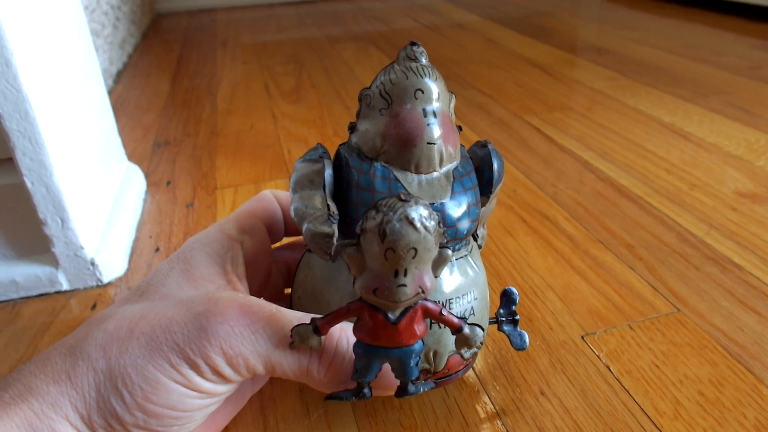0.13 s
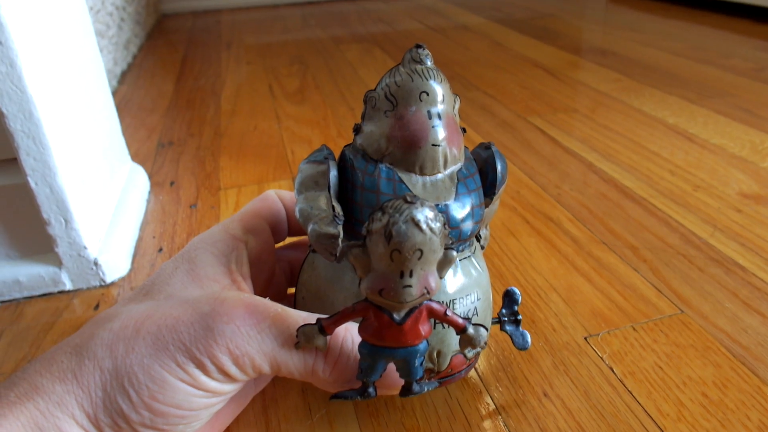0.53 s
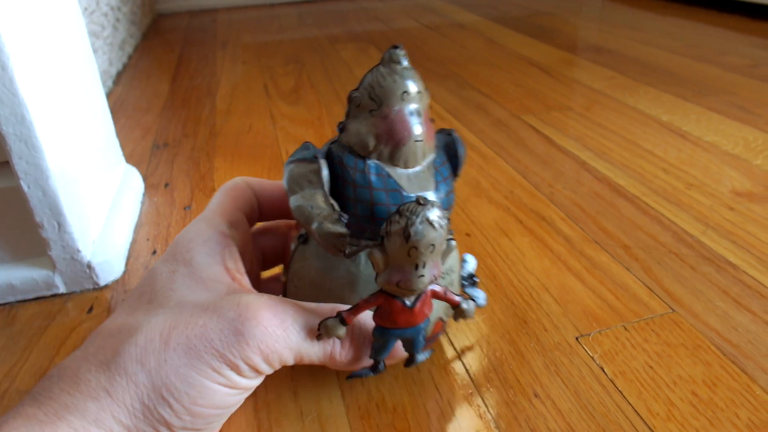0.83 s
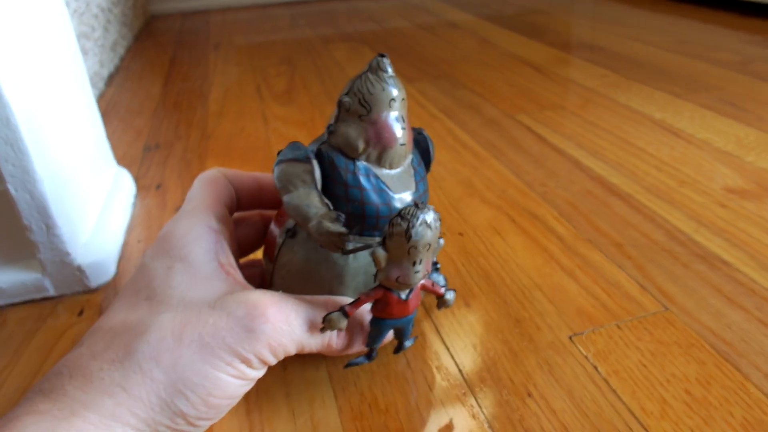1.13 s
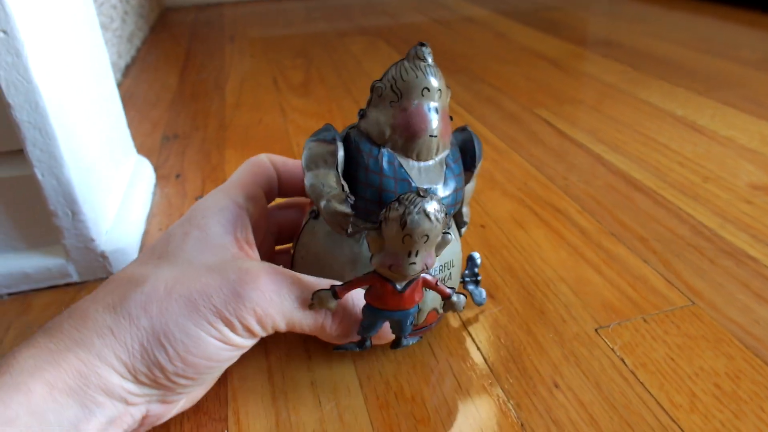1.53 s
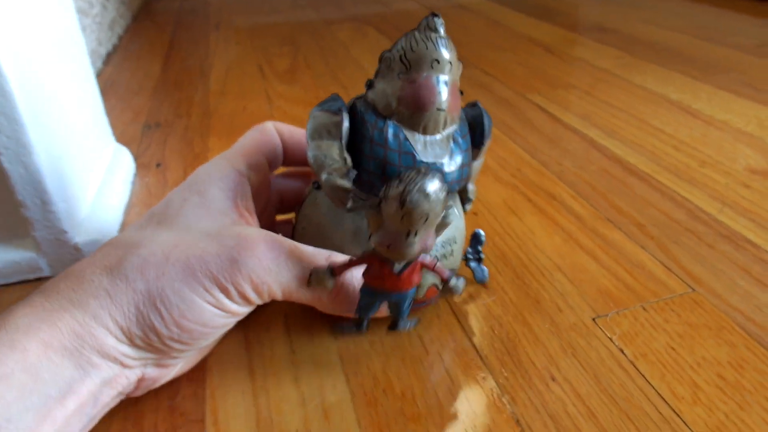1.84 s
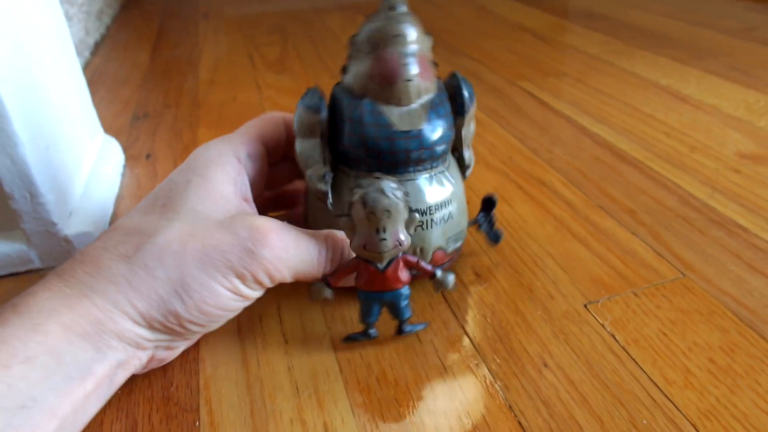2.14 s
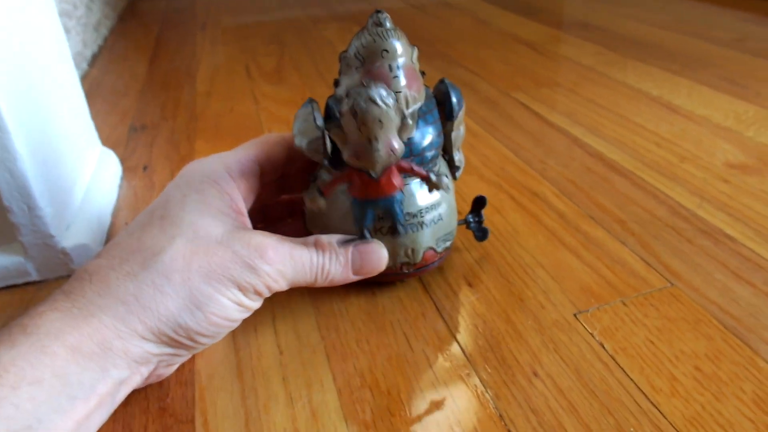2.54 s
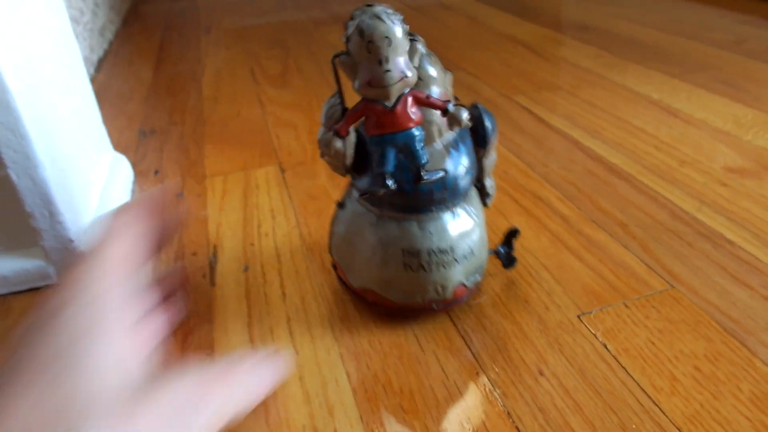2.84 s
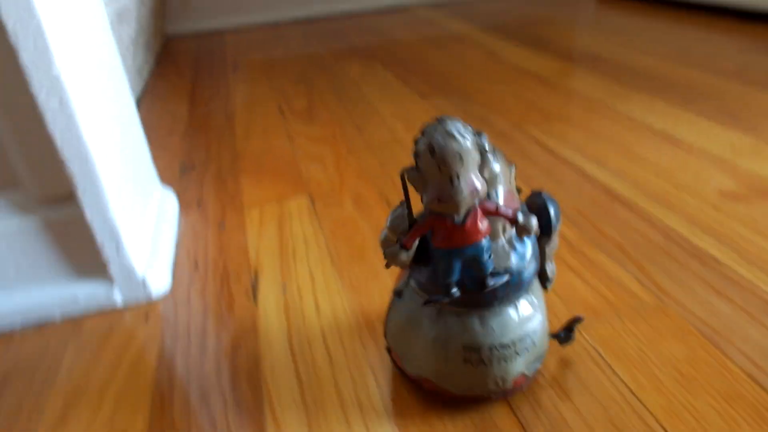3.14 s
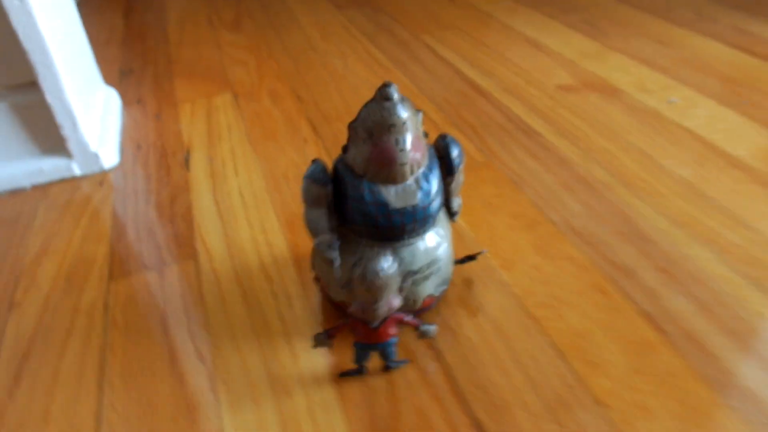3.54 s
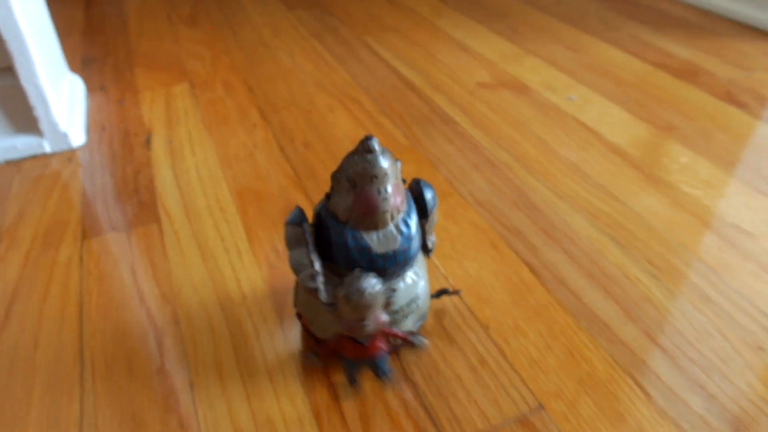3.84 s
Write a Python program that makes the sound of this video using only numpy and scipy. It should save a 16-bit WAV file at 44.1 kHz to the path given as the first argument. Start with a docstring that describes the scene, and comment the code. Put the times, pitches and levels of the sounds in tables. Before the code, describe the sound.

A wind-up tin toy on a wooden floor, heard close in a quiet room with faint hum and hiss. A soft tick at 0.4 s, small ticks and tin knocks at 1.1-1.4 s, then a faint judder and squeak until 1.75 s. From 1.86 s loud clockwork clacks and gears chatter, slowing and stumbling around 2.2-2.5 s, then running fast, about forty-five clacks a second, with tinny ringing, clinks and floor thuds, until the cut at 4 s.

```python
"""A wind-up tin toy on a wooden floor in a quiet room: small joints tick (damped noise bursts).
As the hand turns it, loose tin knocks (ringing bursts) and the base judders on the boards, slow to squeaky (slips).
Then the clockwork clacks (double-decay blows) over chattering gears (a click per tooth), stumbles under the hand
and runs free; the tin shell rings (resonances), a loose part clinks (damped sines), the base scrapes and bumps.
Room tone, a wavering hum, a faint whine and hiss lie beneath."""
import sys
import numpy as np
from scipy import signal
from scipy.fft import rfft, irfft
from scipy.io import wavfile
from scipy.ndimage import uniform_filter1d

SR = 44100
rng = np.random.default_rng(int(sys.argv[2]) if len(sys.argv) > 2 else 0)


def persist_wave(psi):
    """Save psi, clipped to +-1, as 16-bit WAV."""
    counts = np.round(np.clip(psi, -1, 1) * 32767).astype(np.int16)
    wavfile.write(sys.argv[1], SR, np.atleast_2d(counts).T)


N = 176400
T = np.arange(N) / SR
FREQ = np.maximum(np.arange(N + 1) * SR / (2 * N), 1)
BLOW_GRAIN, GEAR_GRAIN = 0.14, 0.27  # unevenness of the tiny contacts (log size)


def undb(db):
    """Decibels to gain."""
    return 10 ** (np.asarray(db) / 20)


def curve(table, axis=1):
    """One column of a table, linear in time."""
    rows = np.array(table)
    return np.interp(T, rows[:, 0], rows[:, axis])


def across(table):
    """A table, linear over log frequency."""
    rows = np.array(table)
    return np.interp(np.log(FREQ), np.log(rows[:, 0]), rows[:, 1])


def apply(x, response):
    """Filter by a frequency response."""
    return irfft(rfft(x, 2 * N) * response)[..., :N]


def colour(table):
    """Causal (minimum-phase) response of unit power through (f/Hz, gain/dB) points."""
    gain = undb(across(table))
    cepstrum = irfft(np.log(gain / np.sqrt(np.mean(gain ** 2))))
    cepstrum[1:N] *= 2
    cepstrum[N + 1:] = 0
    return np.exp(rfft(cepstrum))


def modes(table):
    """Summed response of damped resonances (f/Hz, width/Hz, gain/dB)."""
    return sum(undb(db) / (1 + 1j * (FREQ ** 2 - hz ** 2) / (FREQ * width)) for hz, width, db in table)


def walk(rate_hz):
    """Smooth random drift with a spread near 1."""
    k = max(int(SR / rate_hz), 2)
    steps = np.repeat(rng.standard_normal(N // k + 1), k)
    return uniform_filter1d(steps, k)[:N] * np.sqrt(3 / 2)


def grains(uneven):
    """Dense tiny contacts at two microphones: alike in the bass, unlike in the treble."""
    # unlike part of the power: f/Hz, share [0..1]
    unlike = [(300, 0.0054), (2500, 0.17), (5000, 0.45), (10000, 0.97)]
    size = np.exp(uneven * np.repeat(rng.standard_normal(N // 12 + 1), 12)[:N])
    noise = rng.standard_normal((3, N)) * size / np.sqrt(np.mean(size ** 2))
    share = np.clip(across(unlike), 0, 1)
    return apply(noise[0], np.sqrt(1 - share)) + apply(noise[1:], np.sqrt(share))


def fall(age, decay_s):
    """Instant attack, exponential decay."""
    return (age >= 0) * np.exp(-np.abs(age) / decay_s)


def blows(times, dbs, shape):
    """Envelope of blows whose powers add; shape gives one blow against its age in s."""
    power = np.zeros(N)
    for at, db in zip(times, dbs):
        near = slice(max(int((at - .02) * SR), 0), int((at + .08) * SR))
        power[near] += (undb(db) * shape(T[near] - at)) ** 2
    return np.sqrt(power)


def taps(times, dbs):
    """Single-sample pushes, each with the energy of 5 ms of sound at its level."""
    force = np.zeros(N)
    force[(np.array(times) * SR).astype(int)] = undb(dbs) * np.sqrt(.005 * SR)
    return force


def clack(age):
    """One blow: the tooth slides briefly, strikes, then bounces."""
    lead_s, lead_db = .002, -7
    crack_s = 0.0007
    bounce_s, bounce_db = 0.0048, -2.5
    lead = undb(lead_db) * fall(-age, lead_s)
    return fall(age, crack_s) + undb(bounce_db) * fall(age, bounce_s) + lead


def clockwork():
    """Escapement blows, gear chatter and bumps drive the tin shell and the boards under it."""
    # escapement blows: t/s
    ticks = [1.866, 1.895, 1.915, 1.939, 1.958, 1.984, 2.004, 2.033, 2.049, 2.073, 2.089, 2.114, 2.135,
             2.167, 2.189, 2.234, 2.269, 2.323, 2.375, 2.448, 2.485, 2.531, 2.557, 2.596, 2.622, 2.662,
             2.686, 2.72, 2.741, 2.768, 2.789, 2.821, 2.845, 2.874, 2.895, 2.922, 2.941, 2.972, 2.993, 3.02,
             3.037, 3.062, 3.08, 3.106, 3.124, 3.15, 3.17, 3.195, 3.214, 3.243, 3.264, 3.29, 3.305, 3.331,
             3.344, 3.366, 3.388, 3.41, 3.426, 3.447, 3.465, 3.489, 3.504, 3.529, 3.548, 3.573, 3.587,
             3.613, 3.631, 3.658, 3.675, 3.699, 3.716, 3.743, 3.759, 3.784, 3.803, 3.834, 3.856, 3.88,
             3.902, 3.933, 3.951, 3.977]
    # blow strength: t/s, level/dB
    drive = [(1.86, -18), (2.3, -17.5), (2.65, -16.5), (3.0, -18.5), (4.0, -20)]
    # gear chatter: t/s, bright level/dB, low level/dB
    gears = [(1.857, -32.5, -43.5), (1.95, -32, -41.5), (2.255, -30, -42), (2.29, -32.5, -45.5),
             (2.41, -38, -48.5), (2.525, -31, -41), (2.535, -26.5, -37.5), (2.58, -32, -38),
             (3.05, -29, -42.5), (3.35, -29, -39), (4.0, -30.5, -38)]
    # colour of the bright clatter: f/Hz, gain/dB
    clatter = [(300, -58.5), (1200, -8.5), (1500, 0.5), (1900, -6), (2150, 5.5), (3000, 5), (3800, 1),
               (7000, -2.5), (10500, -0.5), (15500, -3)]
    # colour of the shell's thud: f/Hz, gain/dB
    shell_thud = [(60, -44.5), (280, -25.5), (360, -15.5), (540, -2.5), (850, 3.5), (1240, 2), (1340, -8),
                  (1800, -3), (3000, -31.5)]
    # shell resonances: f/Hz, width/Hz, gain/dB
    shell = [(837, 55, -8.5), (1227, 50, 3), (1740, 40, -3), (2240, 46, -8), (2893, 62, -2.5),
             (2960, 49, -4), (3400, 62, -6), (4230, 120, -7.5)]
    # level of the two lowest shell resonances: t/s, gain/dB
    ring_fade = [(2.95, 1), (3.3, -4.5)]
    # colour of the floorboards: f/Hz, gain/dB
    boards = [(60, -31.5), (250, -21), (315, -0.5), (440, 0.5), (560, 3), (1100, -4), (2000, -32.5)]
    # how firmly the base bears on the floor: t/s, gain/dB
    contact = [(1.86, -19), (2.15, -2.5), (2.3, 1), (2.39, -6.5), (2.46, 4), (2.62, -3), (2.95, 3),
               (3.3, -1), (4.0, -11.5)]
    # low floor resonances: f/Hz, width/Hz, gain/dB
    floor_modes = [(148, 21, 4.5), (220, 26, 9.5)]
    # their level, swelling once the hand lets go, sinking later: t/s, gain/dB
    boom = [(2.2, -7), (2.6, -2), (3.1, 3.5), (4.0, -4)]
    thud_db, thud_s = -10, 0.003  # dull part of each blow, re the blow
    ring_vary_db = 2.5

    blow_db = np.interp(ticks, *np.array(drive).T)
    clicks = blows(ticks, blow_db, clack) * grains(BLOW_GRAIN)
    thuds = blows(ticks, blow_db + thud_db, lambda age: fall(age, thud_s)) * grains(BLOW_GRAIN)
    chatter = teeth() * (T > gears[0][0])
    bright = clicks + chatter * undb(curve(gears))
    low = thuds + bumps() + chatter * undb(curve(gears, axis=2))

    fade = undb(curve(ring_fade))
    tin = apply(shifting(bright), colour(clatter)) + apply(low * np.sqrt(fade), colour(shell_thud))
    low_ring = apply(tin * fade * undb(ring_vary_db * walk(40)), modes(shell[:2]))
    high_ring = apply(tin * undb(ring_vary_db * walk(40)), modes(shell[2:]))
    knocked_boards = apply(low * undb(curve(contact)), colour(boards))
    booming_floor = apply(low * undb(curve(boom)), modes(floor_modes))
    return tin + low_ring + high_ring + clinks() + knocked_boards + booming_floor


def teeth():
    """Gear teeth catch at uneven intervals, each with its own strength, over a steady rub."""
    mesh_hz, mesh_jitter = 338.1, .3  # median tooth rate; log spread
    decay_cycles = 0.26
    scatter_db, rub_db = 3.5, -10.5  # rub re a median click's peak
    turns = np.cumsum(mesh_hz * np.exp(mesh_jitter * walk(200))) / SR
    size = undb(scatter_db * rng.standard_normal(N))[turns.astype(int)]
    bite = undb(rub_db) + size * np.exp(-(turns % 1) / decay_cycles)
    return bite / np.sqrt(np.mean(bite ** 2)) * grains(GEAR_GRAIN)


def shifting(x):
    """Each blow lands a little differently, so the octaves swell and sink on their own."""
    zone_db = 2  # swing limit, either way
    octave = np.log2(np.clip(FREQ, 1000, 16000) / 1000)
    spectrum = rfft(x, 2 * N)
    total = 0
    for k in range(5):
        band = irfft(spectrum * np.maximum(1 - np.abs(octave - k), 0))[:, :N]
        total = total + band * undb(zone_db * np.tanh(walk(45)))
    return total


def bumps():
    """Bumps, each a firm push and a short rattle: the first few thud in the shell while the toy is off the
    floor, the later ones are the rocking base landing on the boards."""
    # bumps: t/s, level/dB
    bump_rows = [(1.865, -32), (2.048, -32.5), (2.074, -27.5), (2.165, -32), (2.178, -27.5), (2.189, -30.5),
                 (2.213, -28), (2.233, -27), (2.322, -34), (2.448, -34), (2.531, -37), (2.597, -25),
                 (2.768, -37), (2.922, -27.5), (2.972, -28), (3.019, -29.5), (3.061, -35.5), (3.107, -37),
                 (3.15, -34.5)]
    rattle_db, rattle_s = -0.5, 0.0064  # re the push level; decay
    times, dbs = np.array(bump_rows).T
    rattle = blows(times, dbs + rattle_db, lambda age: fall(age, rattle_s))
    return taps(times, dbs) + rattle * grains(BLOW_GRAIN)


def clinks():
    """A loose tin part is flung against the shell: damped sines, never at quite the same pitch."""
    # clinks: t/s, level/dB
    hits = [(1.866, -14), (2.25, -15), (2.268, -18), (2.322, -17), (2.994, -15), (3.125, -18.5),
            (3.169, -17), (3.213, -19), (3.307, -18), (3.345, -14.5), (3.504, -12.5), (3.614, -12.5),
            (3.742, -19.5)]
    mean_hz, spread, decay_s = 2994, 0.032, 0.0028  # spread as a share of the pitch
    pitches = mean_hz * (1 + spread * rng.standard_normal(len(hits)))
    total = np.zeros(N)
    for (at, db), hz in zip(hits, pitches):
        age = T - at
        total += undb(db) * fall(age, decay_s) * np.sin(2 * np.pi * hz * age)
    return total


def sliding():
    """The base sticks and slips, slowly, then fast enough to squeak; later it scrapes as the toy lurches."""
    # stick-slip: t/s, slip rate/Hz, level/dB
    slide = [(1.37, 101, -52), (1.39, 78, -47.5), (1.54, 48, -53), (1.575, 135, -43.5), (1.605, 163, -46),
             (1.635, 526, -40.5), (1.657, 360, -39.5), (1.71, 630, -42.5), (1.728, 940, -51),
             (1.745, 550, -72)]
    # scrape: t/s, level/dB
    scrape_level = [(2.13, -46), (2.168, -30), (2.232, -42), (2.26, -64)]
    # colour of the sliding base: f/Hz, gain/dB
    slip_colour = [(80, -39), (250, -11), (500, 1.5), (950, 2), (1700, -4.5), (2100, -11), (4500, -18.5),
                   (6000, -27), (15000, -39)]
    jitter, scatter_db, hiss_db = .035, 3, -10  # log rate spread; slip strength; hiss re slips
    rate_hz = curve(slide)
    turns = np.cumsum(rate_hz * np.exp(jitter * walk(250))) / SR
    # sqrt(SR / rate) keeps the power independent of the rate
    slips = np.diff(np.floor(turns), prepend=0) * np.sqrt(SR / rate_hz) * undb(scatter_db * walk(500))
    rub = grains(GEAR_GRAIN)
    slide_on = (T > slide[0][0]) * (T < slide[-1][0])
    force = (slips + undb(hiss_db) * rub) * undb(curve(slide, axis=2)) * slide_on
    scrape_on = (T > scrape_level[0][0]) * (T < scrape_level[-1][0])
    scrape = rub * undb(curve(scrape_level) + 2 * walk(300)) * scrape_on
    return apply(force + scrape, colour(slip_colour))


def handling():
    """Loose tin parts knock as the hand turns the toy: short bursts ring the held toy."""
    # knocks: t/s, level/dB, decay/s
    knocks = [(1.156, -42.5, 0.03), (1.175, -43, .008), (1.2155, -26.5, 0.004), (1.355, -37, 0.0074),
              (1.377, -31.5, 0.0052)]
    # ring of the held toy: f/Hz, width/Hz, gain/dB
    held = [(835, 60, 1.5), (1038, 13, 6.5), (2096, 35, 6), (2930, 15, 3), (4500, 33, 9)]
    # colour of a knock: f/Hz, gain/dB
    knock_colour = [(150, -21), (600, -14), (800, -2.5), (1500, -7), (4500, -17.5), (5500, -26),
                    (16000, -35)]
    force = sum(undb(db) * fall(T - at, decay_s) for at, db, decay_s in knocks)
    return apply(force * grains(BLOW_GRAIN), colour(knock_colour) * (1 + modes(held)))


def joints():
    """Small joints tick: decaying contact noise through a doubled resonance at each one's own pitch."""
    # ticks: t/s, level/dB, f/Hz
    joint_ticks = [(0.404, -26.5, 1830), (0.419, -38, 8300), (1.107, -27.5, 2020), (1.174, -44, 9000),
                   (1.197, -23.5, 2930), (1.2155, -41, 8900), (1.305, -30, 3280), (1.377, -25.5, 5900)]
    decay_s, width_hz = 0.0032, 1220  # width of one of the two passes
    rub = grains(BLOW_GRAIN)
    total = 0
    for at, db, hz in joint_ticks:
        total = total + undb(db) * apply(rub * fall(T - at, decay_s), modes([(hz, width_hz, 0)]) ** 2)
    return total


def room(x):
    """A short diffuse tail from floor and walls, alike at both microphones in the bass."""
    t60_s, tail_db = 0.31, -9
    tail = grains(0) * undb(-60 * T / t60_s) * (T > .004)
    tail = tail / np.sqrt(np.sum(tail ** 2, axis=1, keepdims=True))
    return x + undb(tail_db) * apply(x, rfft(tail, 2 * N))


def background():
    """Noise-made room tone and treble hiss of changing level, a wavering hum and a faint high whine."""
    # colour of the room tone: f/Hz, gain/dB
    tone_colour = [(15, -28), (25, -14.5), (167, -8.5), (202, -1.5), (301, -6), (850, -12), (11500, -36),
                   (15000, -61)]
    # colour of the hiss: f/Hz, gain/dB
    hiss_colour = [(300, -1), (1500, -2.5), (4000, -6.5), (8000, -11), (15500, -17.5)]
    # t/s, tone gain/dB, hiss level/dB
    gains = [(0, -53, -62.5), (.7, -50.5, -64.5), (1.27, -49, -54.5), (1.4, -44, -50.5), (1.84, -52.5, -47),
             (1.9, -73, -67), (4.0, -57, -56.5)]
    hum_hz, hum_rms_db = 196.7, -66  # means; both waver
    whine_hz, whine_peak_db = 11045, -81
    shared, separate = rng.standard_normal(N) * 0.45, rng.standard_normal((2, N)) * 0.64
    tone = apply(shared + separate, colour(tone_colour))
    hum_phase = 2 * np.pi * np.cumsum(hum_hz + 2 * walk(12)) / SR
    hum = undb(hum_rms_db + 2 * walk(6.3)) * np.sqrt(2) * np.sin(hum_phase)
    whine = undb(whine_peak_db) * np.sin(2 * np.pi * whine_hz * T)
    hiss = apply(rng.standard_normal((2, N)), colour(hiss_colour))
    return tone * undb(curve(gains)) + hum + whine + hiss * undb(curve(gains, axis=2))


def scene():
    """The toy stands a little to the right, close to the microphones; only the knocks get no room tail."""
    # stereo image of the toy: f/Hz, left minus right/dB
    balance = [(100, -1.5), (1200, -5), (2700, -7), (4500, -4), (11500, -1.7), (15000, -2.5)]
    toy = room(clockwork() + sliding() + joints()) + handling()
    lean_db = across(balance) / 2
    return apply(toy, undb(np.array([lean_db, -lean_db]))) + background()


def record(dry):
    """Silent for 30 ms, then a 6 ms fade-in; high peaks are rounded and the top is cut."""
    ceiling, top_hz = 0.3, 15850  # ceiling in full scale
    opened = np.clip((T - .03) / .006, 0, 1)
    rounded = dry / np.sqrt(np.sqrt(1 + np.square(np.square(dry / ceiling))))
    lowpass = signal.ellip(10, .2, 80, top_hz, fs=SR, output="sos")
    return signal.sosfilt(lowpass, rounded * opened)


dry = scene()
out = record(dry)
persist_wave(out)
```